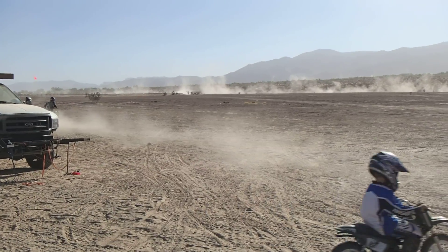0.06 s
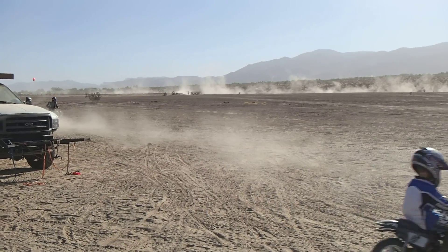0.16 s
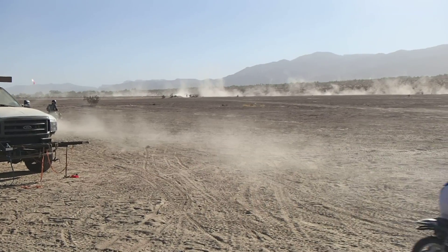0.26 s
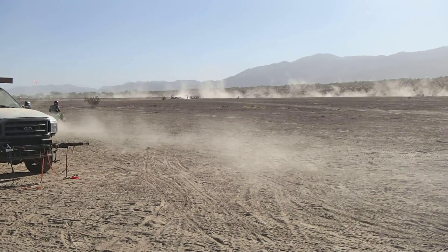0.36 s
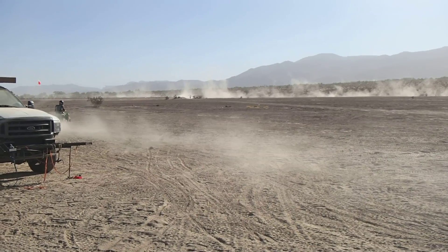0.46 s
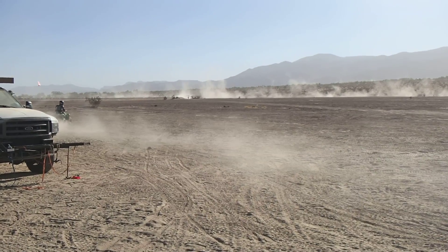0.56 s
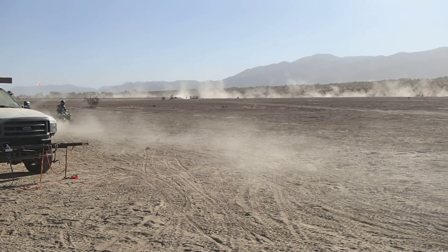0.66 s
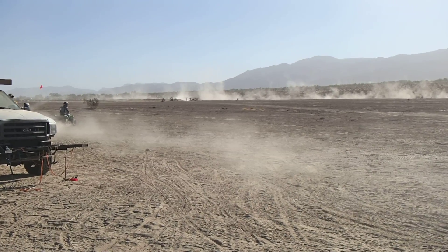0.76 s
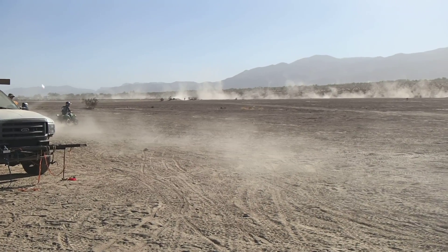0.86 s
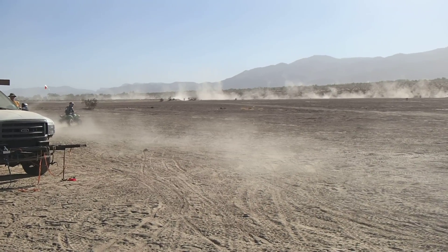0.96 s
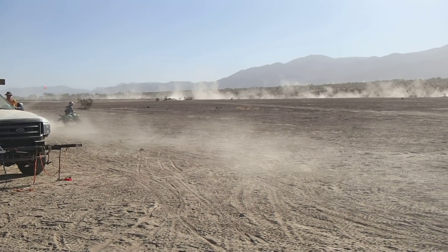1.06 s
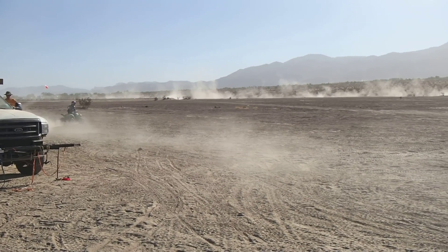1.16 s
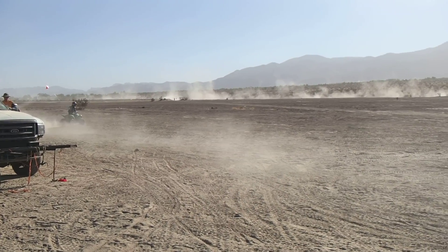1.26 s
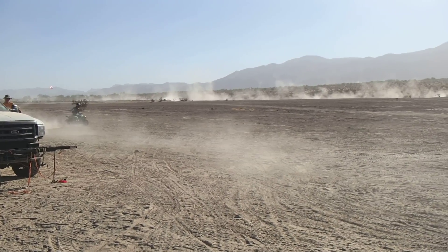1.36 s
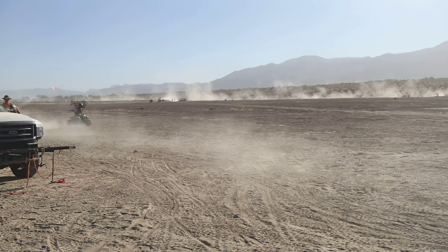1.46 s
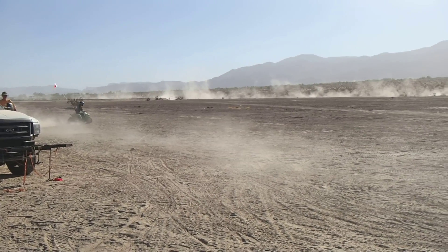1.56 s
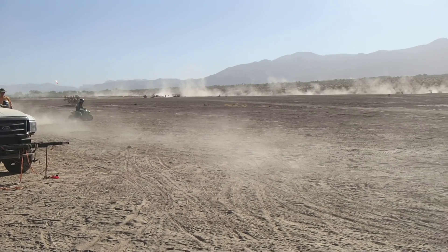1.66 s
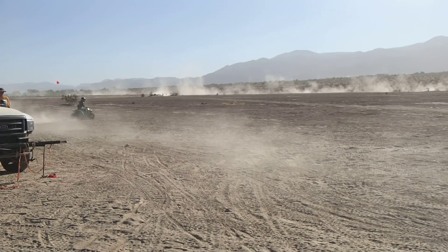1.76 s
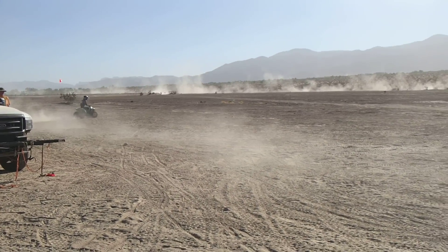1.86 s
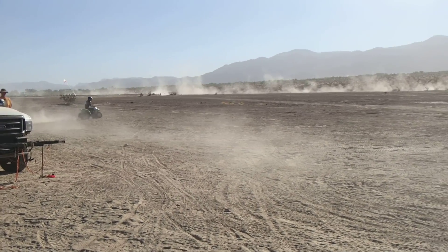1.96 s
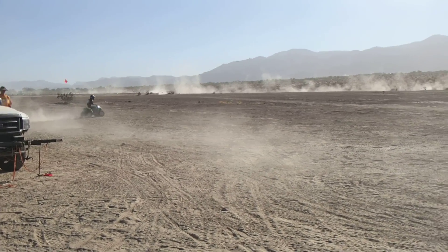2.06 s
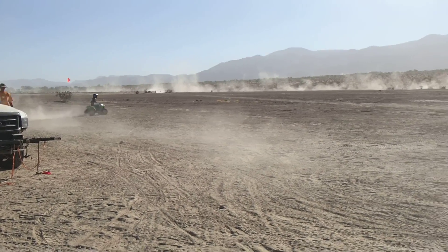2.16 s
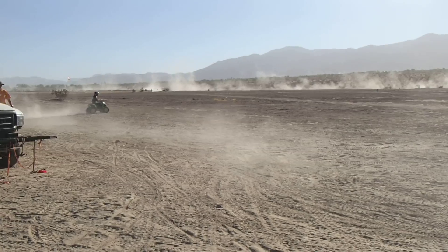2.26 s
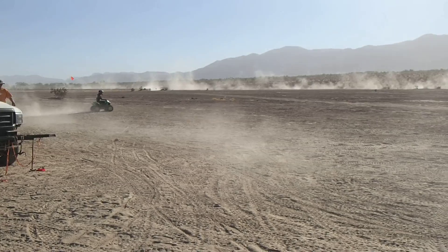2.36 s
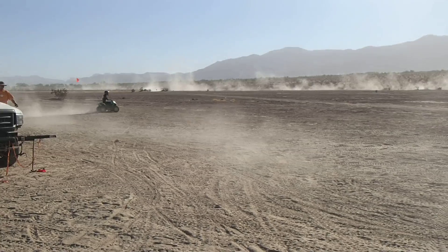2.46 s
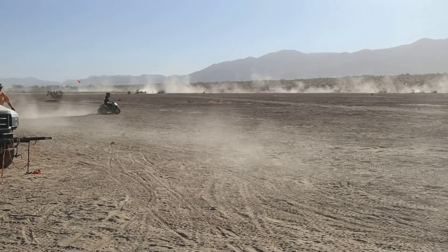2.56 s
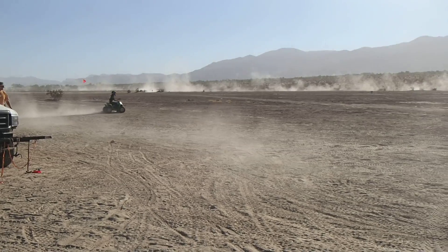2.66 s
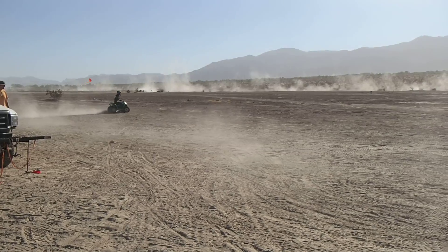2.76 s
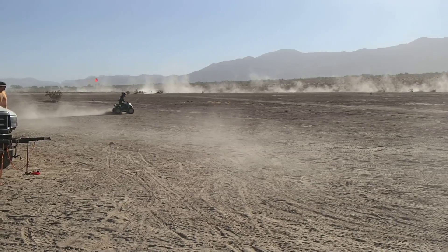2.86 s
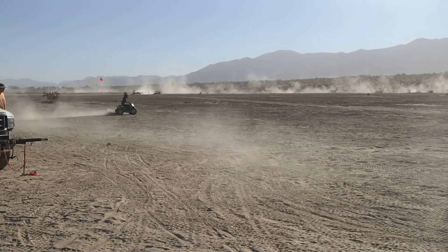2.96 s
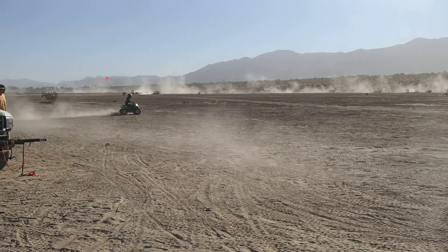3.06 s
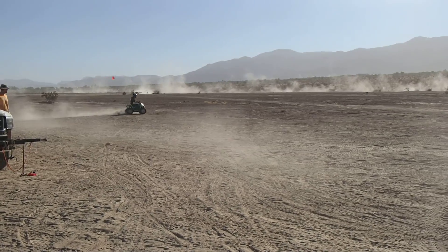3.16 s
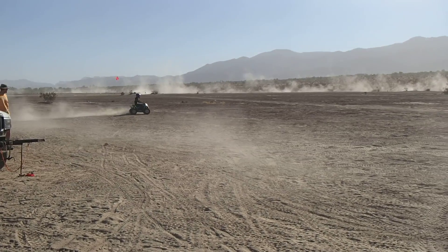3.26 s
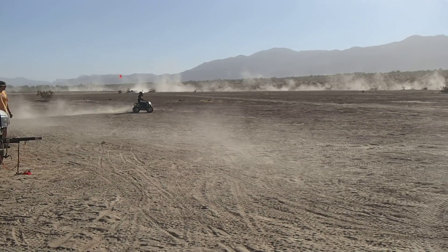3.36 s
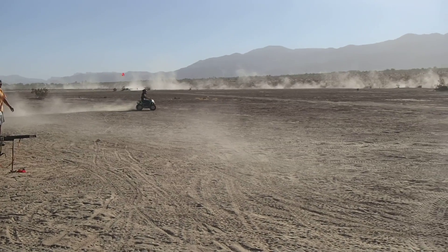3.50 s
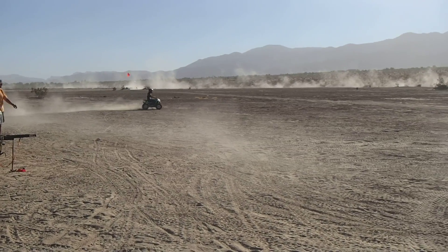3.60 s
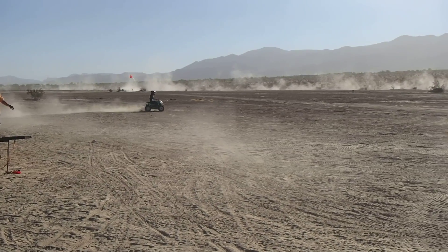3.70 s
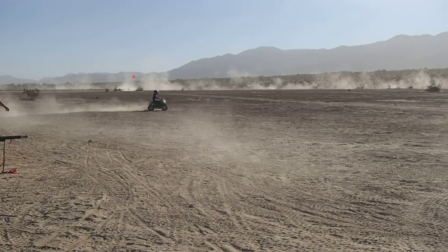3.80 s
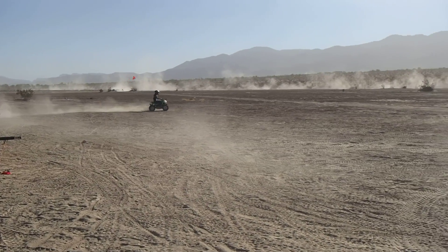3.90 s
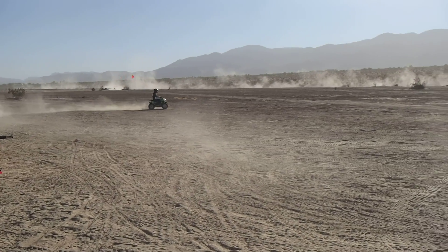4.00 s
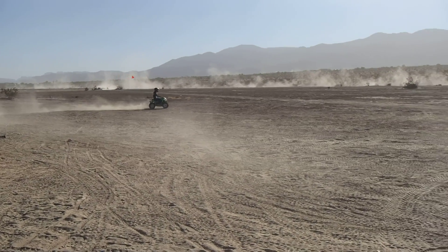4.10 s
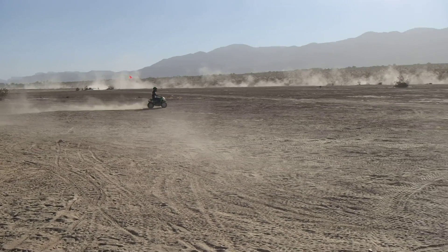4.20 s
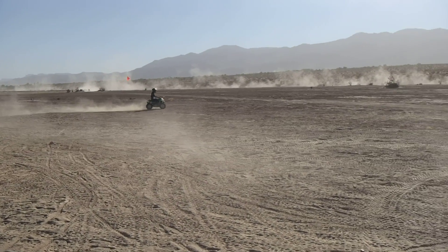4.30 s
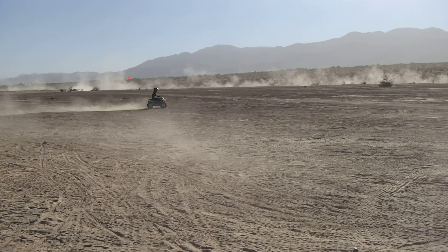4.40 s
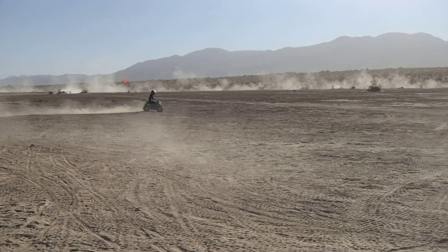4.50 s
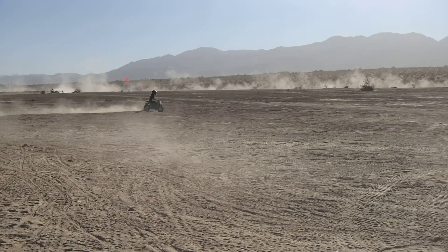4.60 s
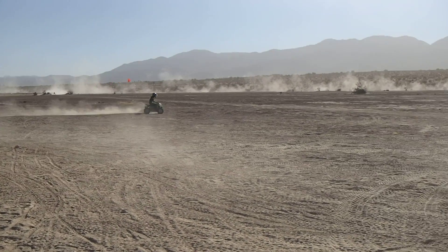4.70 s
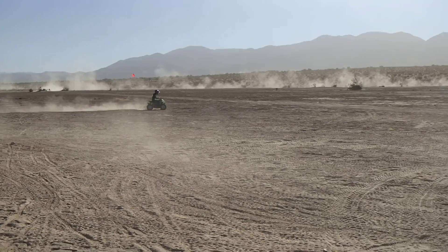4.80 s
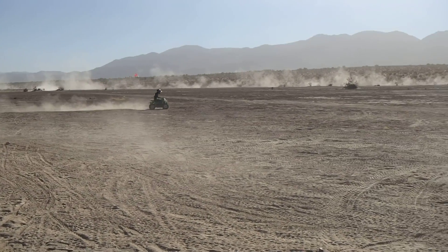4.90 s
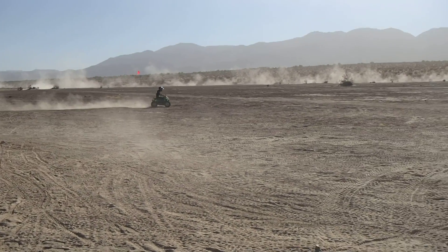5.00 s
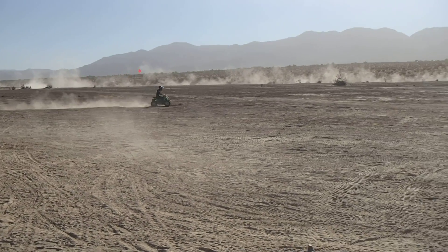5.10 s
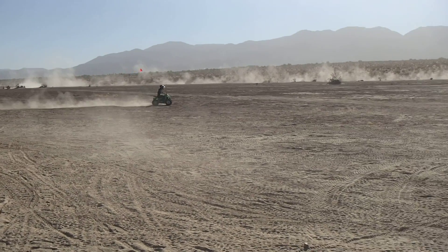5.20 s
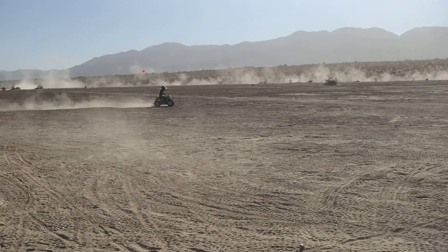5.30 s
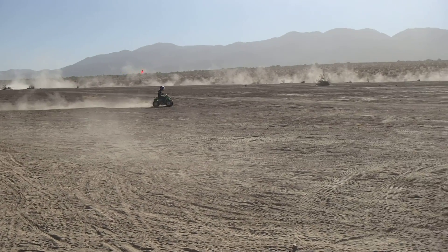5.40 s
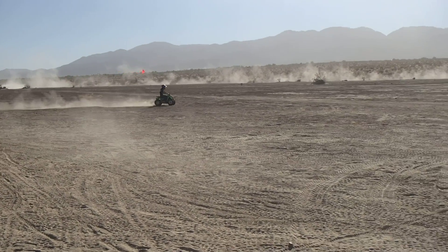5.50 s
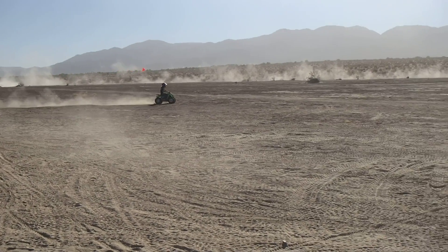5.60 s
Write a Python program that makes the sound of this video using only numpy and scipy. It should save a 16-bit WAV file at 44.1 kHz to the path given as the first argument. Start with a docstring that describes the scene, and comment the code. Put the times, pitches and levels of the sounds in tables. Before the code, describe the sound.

A small quad bike pulls away across open desert, revving three times and dropping to a popping, uneven idle in between.

```python
"""A small four-stroke quad bike pulls away tail-on over open desert, against the rumble of far vehicles.
Each firing of its single cylinder rings the exhaust; the engine rattles and gears whine. A dirt bike
putters softly. At half a second the quad's throttle shuts, and only a few cycles catch and pop.
It swings round in a wide arc, chain jingling, and pulls again at 2.1 s; a distant engine drones a while.
Fainter and turning side-on, the quad pulls a third time at 3.6 s, then runs down to popping again."""
import sys
import numpy as np
from scipy import signal
from scipy.fft import rfft, irfft
from scipy.io import wavfile

SR = 44100
rng = np.random.default_rng(int(sys.argv[2]) if len(sys.argv) > 2 else 0)


def log_audio(samples):
    """Write samples as a 16-bit WAV file to the path given in sys.argv[1]."""
    # one column per channel
    frames = np.atleast_2d(samples).T
    # limit to full scale, then quantise
    limited = np.clip(frames, -1, 1)
    pcm = np.round(limited * 32767).astype(np.int16)
    wavfile.write(sys.argv[1], SR, pcm)


N = 249165

FULL_HZ = 60   # engine cycles per second at full revs
# Pulls on the throttle. Each row: opening time in seconds, run-up in seconds,
# speed gained before sag in Hz, shutting time in seconds, run-down in seconds.
PULLS = [(-.3, .2, 10.98, .527, .313), (2.075, .1945, 10.27, 2.794, .432), (3.61, .274, 11.12, 4.706, .503)]
# The quad's level as its distance changes. Each row: time in seconds, gain in dB.
NEARNESS = [(0, 7), (.5, 4.5), (1.0, 1.5), (1.7, -0.14), (2.6, -1.3), (3.3, -3), (4.0, -5.5), (4.6, -6.5),
            (5.1, -8), (5.65, -6)]
# The quad's turn. Each row: time in seconds, heading from 0 (tail-on) to 3 (side-on).
HEADING = [(.14, 0), (.28, 1), (.62, 1), (.85, 1.6), (1.25, 2), (2.9, 2), (3.8, 3)]


def amp(db):
    """Decibels to amplitude ratio."""
    return 10 ** (np.asarray(db) / 20)


def rms_one(x):
    """Normalisation to unit rms."""
    return x / np.sqrt(np.mean(x ** 2) + 1e-20)


def curve(rows, s):
    """Linear interpolation of (time, value) rows."""
    return np.interp(s, *np.transpose(rows))


def butter(x, hz, kind, order):
    """Maximally flat low- or high-pass filter."""
    return signal.sosfilt(signal.butter(order, min(hz, .45 * SR), kind, fs=SR, output="sos"), x)


def wander(per_s):
    """Random fluctuation of unit variance, with per_s new values a second."""
    knots = rng.standard_normal(N // 20)
    return np.interp(np.arange(N) / SR * per_s, np.arange(len(knots)), knots) * np.sqrt(3 / 2)


def noise(colour):
    """Spectral shaping of white noise, at unit rms."""
    hz, db = np.transpose(colour)
    bins = np.maximum(np.fft.rfftfreq(N, 1 / SR), 1)
    gain = amp(np.interp(np.log(bins), np.log(hz), db))
    return rms_one(irfft(rfft(rng.standard_normal(N)) * gain, N))


def resonate(x, hz, width_hz):
    """A damped resonator with unit peak gain."""
    r = np.exp(-np.pi * width_hz / SR)
    feedback = [1, -2 * r * np.cos(2 * np.pi * hz / SR), r * r]
    return signal.lfilter(np.array([1, 0, -1]) * (1 - r * r) / 2, feedback, x + 1e-18)


def engine_speed(t, idle_hz=50.223, creep_hz_per_s=.1328, sag_hz_per_s=2.457):
    """The cycle rate sets the fundamental: idle creeps up with warmth, and each pull sags under load."""
    hz = idle_hz + creep_hz_per_s * t
    for opens, run_up, gained_hz, shuts, run_down in PULLS:
        held_hz = gained_hz - sag_hz_per_s * (np.minimum(t, shuts) - opens)
        hz = hz + held_hz * np.interp(t, [opens, opens + run_up, shuts, shuts + run_down], [0, 1, 1, 0])
    # The engine bogs in the first pull. One row: time in seconds, loss in Hz, half length in seconds.
    bog = (.2165, 3.522, .158)
    when, lost_hz, half_s = bog
    return hz - lost_hz * np.maximum(1 - abs(t - when) / half_s, 0)


def firings(cycles, steady_burn_hz=53, build_up_db=9, build_up_s=.06, afterpop_loss_db=1):
    """Impulse excitation: a click as the exhaust valve opens, strong if the charge burnt, weak if not."""
    # Near idle every fourth or fifth cycle catches, and the next pops more weakly. Each row: first and
    # last pop in seconds, spacing in cycles, pop level in dB, first afterpop in dB relative to its pop.
    pop_runs = [(.68, .68, 5, -4, -3), (.777, .875, 5, -.5, -4.5), (.953, 1.251, 5, 1, -4.5),
                (1.33, 1.528, 5, .5, -11.5), (1.607, 1.846, 4, 0.5, -15), (1.925, 2.085, 4, 1.5, -10),
                (3.122, 3.2, 4, -3.5, -2), (3.298, 3.593, 5, -0.5, -5), (5.181, 5.573, 5, -2.6, -4.5)]
    at = np.flatnonzero(np.diff(np.floor(cycles)))
    s, chance = at / SR, rng.standard_normal(len(at))
    hz = engine_speed(s)
    uneven_db = -.42 * chance
    run_down_db = .94 * (hz - FULL_HZ) + uneven_db   # throttle shut: firings weaken as speed falls
    unfired_db = -26.5 + 4 * chance
    db = np.where(hz > steady_burn_hz, run_down_db, unfired_db)
    for opens, _, _, shuts, _ in PULLS:
        held = (s > opens) & (s < shuts)
        db[held] = uneven_db[held] - build_up_db * np.exp((opens - s[held]) / build_up_s)
    for first, last, every, pop_db, afterpop_db in pop_runs:
        pops = range(np.argmin(abs(s - first)), np.argmin(abs(s - last)) + 1, round(every))
        for n, k in enumerate(pops):
            db[k] = pop_db + .3 * chance[k]
            db[k + 1] = max(db[k + 1], db[k] + afterpop_db - afterpop_loss_db * n)
    clicks = np.zeros(N)
    clicks[at] = amp(db + curve(NEARNESS, s))
    return clicks


def puffs(clicks, length_s):
    """Decaying turbulence: each click becomes a noise burst of the same energy."""
    fade = np.exp(-2 / (length_s * SR))
    power = signal.lfilter([1 - fade], [1, -fade], clicks ** 2 + 1e-18)
    return np.sqrt(power) * rng.standard_normal(N)


def chamber(x, round_trip_s, reflection):
    """All-pass dispersion: a baffled chamber lets a pulse out in instalments, one per round trip."""
    loop = np.zeros(max(int(round_trip_s * SR), 1) + 1)
    loop[0], loop[-1] = 1, reflection
    return signal.lfilter(loop[::-1], loop, x + 1e-18)


def silencer(x, modes, top_hz=4100, bottom_hz=180):
    """Modal resonance: the silencer rings and muffles treble; its small mouth radiates little bass."""
    # The short tailpipe's tinny ring, at every heading. Each row: frequency and width in Hz, gain in dB.
    tailpipe = [(2860, 19, -11), (3690, 17, -30.5)]
    # Side chambers absorb narrow bands. Each row: frequency and width in Hz, share absorbed from 0 to 1.
    hollows = [(1623, 112, 0.64), (3170, 270, 0.44), (498, 90, 0.15)]
    rings = sum(amp(db) * resonate(x, hz, width) for hz, width, db in [*modes, *tailpipe])
    for hz, width, share in hollows:
        rings = rings - share * resonate(rings, hz, width)
    return butter(butter(rings, top_hz, "low", order=7), bottom_hz, "high", order=2)


def exhaust(clicks, t, jet_db=-12.5, crack_db=-20, rich_db_per_hz=.54):
    """Blow-down: each release is a pressure step and a short turbulent jet, both ringing the silencer."""
    # Exhaust modes at headings 0 to 3. Each row: frequency and width in Hz, relative level in dB.
    tail_on = [(224, 29, -2), (323, 130, -15), (676, 37, -32), (1024, 90, 0), (1323, 130, -2),
               (1545, 100, 2), (1787, 55, 3), (2062, 23, -0.5), (2321, 75, -38), (2750, 95, -1.5),
               (3400, 49, -34)]
    veering = [(227.5, 28, -3), (314, 140, -11), (676, 41, -10.5), (990, 72, 3.5), (1170, 205, -2),
               (1527, 120, 2), (1803, 40, -2), (2024, 59, -7), (2554, 69, -6.5), (2690, 62, -4.5),
               (3500, 120, -37)]
    turning = [(219.3, 23, -7), (293, 203, -17), (696, 130, -22), (1010, 142, -2), (1244, 59, -1),
               (1787, 75, -13), (1978, 19, -13), (2257, 45, -13), (2764, 120, -17.0), (3340, 102, -19.5),
               (3940, 74, -57)]
    side_on = [(239.7, 22, -10), (305, 143, -14.5), (774, 73, -10), (977, 120, 0), (1065, 59, -8),
               (1228, 65, 1), (1771, 53, -3), (2370, 99, -28), (2680, 105, -13), (3476, 160, -18),
               (3790, 400, -26)]
    jet = amp(jet_db) * butter(puffs(clicks, length_s=.0045), 1900, "high", order=1)
    # short cavities between the baffles draw the upper part of the step out into a chirp
    steps = clicks
    for round_trip_s, reflection in [(.00023, -.5), (.0002, .75), (.00026, .7)]:
        steps = chamber(steps, round_trip_s, reflection)
    heading, rings = curve(HEADING, t), 0
    # straight behind the pipe, more of the pulse comes out in the silencer's later round trips
    aspects = [(tail_on, .72), (veering, .72), (turning, .86), (side_on, .86)]
    for k, (modes, reflection) in enumerate(aspects):
        drive = chamber(steps, .00105, reflection) + jet
        share = np.maximum(1 - abs(heading - k), 0)
        impulse_gain = np.linalg.norm(silencer(signal.unit_impulse(SR // 10), modes))
        rings = rings + silencer(drive * share, modes) / impulse_gain
    # the gas also cracks at the mouth, harder at low speed when unburnt fuel has gathered
    crack = amp(crack_db + rich_db_per_hz * (53.5 - engine_speed(t))) * puffs(clicks, length_s=.0048)
    return rings + butter(crack, 5000, "low", order=1)


def pumping(cycles, t, pipe_hz=970, thump_hz=290):
    """Displacement: fired or not, the piston's puff rings the main pipe mode and thumps the silencer."""
    db = curve(NEARNESS, t) + 4.5 + .25 * (engine_speed(t) - FULL_HZ)
    beats = np.diff(np.floor(cycles), prepend=0) * amp(db + wander(50))
    ring = resonate(resonate(beats, pipe_hz, width_hz=130), pipe_hz, width_hz=260)
    thump = resonate(resonate(beats, thump_hz, width_hz=110), thump_hz, width_hz=220)
    return ring + amp(-7) * thump


def ground_scatter(x, level_db=-19, t60_s=.022, dull_hz=3500):
    """Diffuse reflection: rough ground and a parked truck return a faint, short spray of echoes."""
    s = np.arange(SR // 4) / SR
    decay = amp(-60 * s / t60_s) * (s > .005)
    echoes = butter(rng.standard_normal(len(s)) * decay, dull_hz, "low", order=1)
    return amp(level_db) * signal.fftconvolve(x, echoes / np.linalg.norm(decay))[:N]


def machinery_levels(t, overrun_whine_db=7):
    """Directivity, distance and engine speed set the levels of clatter, whine and chain, in dB."""
    # Radiation at headings 0 to 3. Each row: clatter in dB, whine in dB relative to it, chain in dB.
    radiated = [(-36.5, -1, -80), (-34.5, -0.5, -80), (-40, 1.5, -53), (-37.5, -1.5, -49.5)]
    near, revs = curve(NEARNESS, t), engine_speed(t) - FULL_HZ
    heading = curve(HEADING, t)
    rattle, whine, chain = (np.interp(heading, range(4), db) for db in np.transpose(radiated))
    # the gears whine louder as the wheels drive the slowing engine
    overrun = sum(np.interp(t, [shuts, shuts + run_down, shuts + 2 * run_down], [0, 1, 0])
                  for *_, shuts, run_down in PULLS)
    clatter_db = near + rattle + .296 * revs
    whine_db = clatter_db + whine + revs + overrun_whine_db * overrun
    chain_db = near + chain + .7 * revs
    return clatter_db, whine_db, chain_db


def clatter(cycles, throb_db=1, flutter_db=2.5):
    """Amplitude modulation: the engine's rattle flutters and swells slightly just after each firing."""
    # The rattle's spectrum. Each row: frequency in Hz, relative spectral density in dB.
    colour = [(150, -25.5), (300, -15.5), (480, -16), (750, -6), (1000, -0.5), (1300, -1.5), (1650, -5.5),
              (2100, -3), (3900, -5), (4350, -14), (5000, -7.5), (5800, -14.5), (6800, -23.5),
              (15000, -55.5)]
    beat_db = throb_db * np.cos(2 * np.pi * (cycles - .15))
    return rms_one(noise(colour) * amp(beat_db + flutter_db * wander(250)))


def gear_whine(cycles, backlash_hz=.55):
    """Tooth meshing makes rough tones; play between the teeth lets the shaft speed waver."""
    # Mesh tones. Each row: multiple of the cycle rate, width in Hz, relative level in dB.
    gears = [(66.4, 60, -14.5), (98.8, 70, -15)]
    shaft = cycles + np.cumsum(backlash_hz * wander(60)) / SR
    whine = 0
    for multiple, width_hz, db in gears:
        mesh = 2 * np.pi * multiple * shaft
        whine += amp(db) * (wander(2 * width_hz) * np.cos(mesh) + wander(2 * width_hz) * np.sin(mesh))
    return whine


def far_vehicles(level_db=-45.5):
    """Incoherent sources: far-off vehicles merge into the steady rumble and hiss of the plain."""
    # The rumble's spectrum. Each row: frequency in Hz, relative spectral density in dB.
    colour = [(20, -30), (40, -58), (60, -5), (90, -3), (135, -2), (230, -1.5), (350, -8.5), (480, -14.5),
              (900, -2), (2000, -28), (5000, -24), (8000, -32.5), (14000, -32), (16000, -40)]
    return noise(colour) * amp(level_db)


def dirt_bike(t, cycle_hz=24.15, silencer_hz=128, width_hz=45):
    """A pulse train drives a resonator: a child's dirt bike putters off on a shut throttle."""
    # The putter's envelope. Each row: time in seconds, level in dB.
    levels = [(0, -73), (.25, -45), (.5, -60), (.9, -60), (1.6, -61), (2.5, -63)]
    beats = np.diff(np.floor(cycle_hz * t), prepend=0) * amp(1.6 * wander(43))
    putter = resonate(resonate(beats, silencer_hz, width_hz), silencer_hz, width_hz)
    return rms_one(putter) * amp(curve(levels, t))


def chain_jingle():
    """Random excitation: the links ring the high modes of chain and guards."""
    # Metal modes. Each row: frequency in Hz, half-width of each resonator in Hz, relative level in dB.
    modes = [(4860, 330, -5.5), (5370, 330, 6), (7070, 670, -4.5)]
    links = rng.standard_normal(N) * amp(3 * wander(200))
    return rms_one(sum(amp(db) * resonate(resonate(links, hz, 2 * half_width), hz, 2 * half_width)
                       for hz, half_width, db in modes))


def distant_drone(t, waver_hz=5, waver_db=1.7):
    """Frequency and amplitude modulation: a far engine is heard as one wavering tone."""
    # The tone's course. Each row: time in seconds, frequency in Hz, level in dB.
    drone = [(2.5, 331.7, -85), (2.9, 340, -50), (3.15, 344, -54.5), (3.5, 358.7, -52), (3.9, 373, -55),
             (4.2, 367, -80)]
    s, hz, db = np.transpose(drone)
    phase = 2 * np.pi * np.cumsum(np.interp(t, s, hz) + waver_hz * wander(25)) / SR
    return np.sin(phase) * amp(np.interp(t, s, db) + waver_db * wander(15))


def scene():
    """Superposition, in mono, of the quad and the other vehicles."""
    t = np.arange(N) / SR
    cycles = np.cumsum(engine_speed(t)) / SR + .175
    bark = exhaust(firings(cycles), t) + pumping(cycles, t)
    quad = bark + ground_scatter(bark)
    clatter_db, whine_db, chain_db = machinery_levels(t)
    quad += amp(clatter_db) * clatter(cycles)
    quad += amp(whine_db) * gear_whine(cycles)
    quad += amp(chain_db) * chain_jingle()
    return (quad + dirt_bike(t) + distant_drone(t) + far_vehicles())[None]


def record(dry):
    """Band limiting: a steep low-pass cuts the treble above 15.8 kHz."""
    return signal.sosfilt(signal.ellip(10, .1, 70, 15800, fs=SR, output="sos"), dry)


dry = scene()
out = record(dry)
log_audio(out)
```